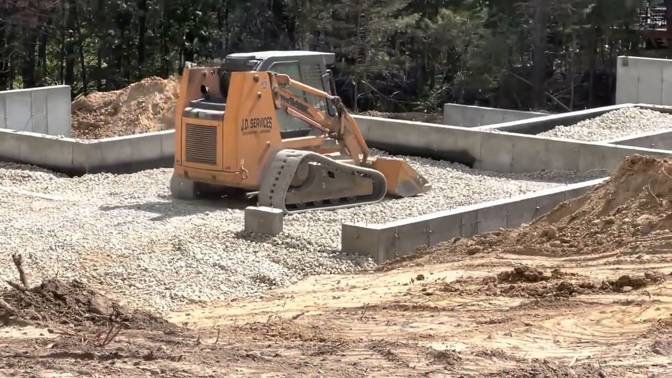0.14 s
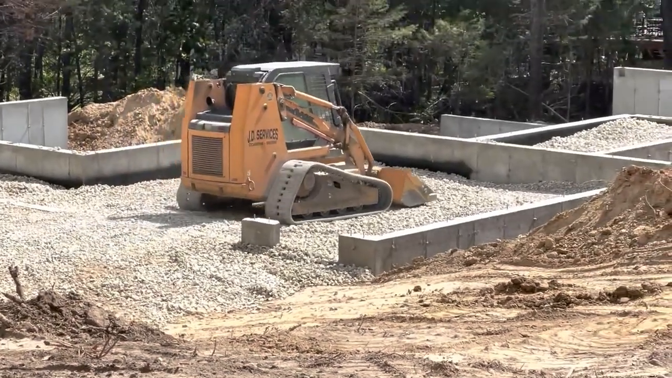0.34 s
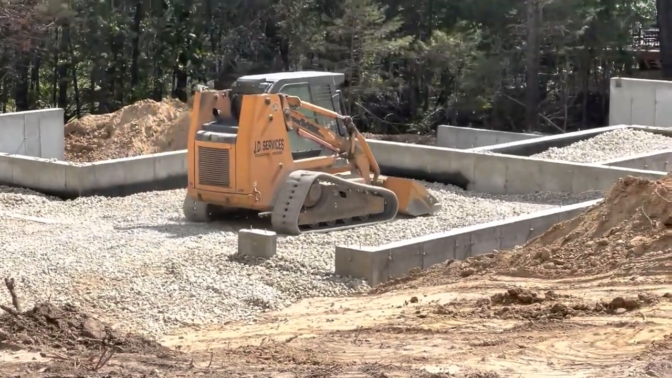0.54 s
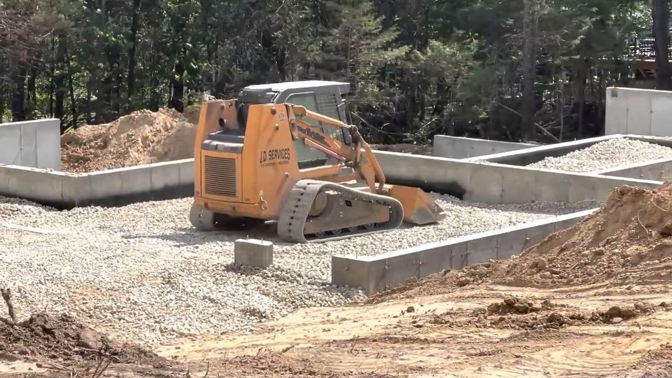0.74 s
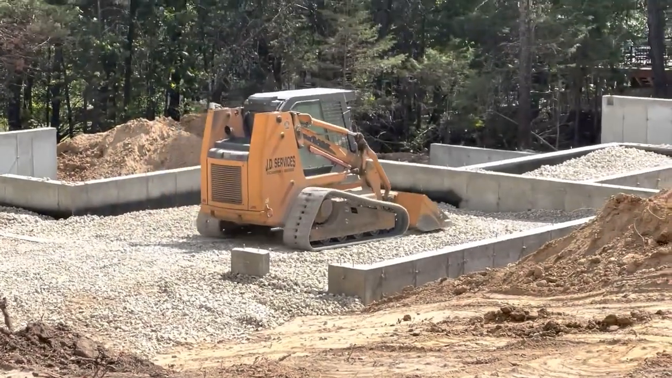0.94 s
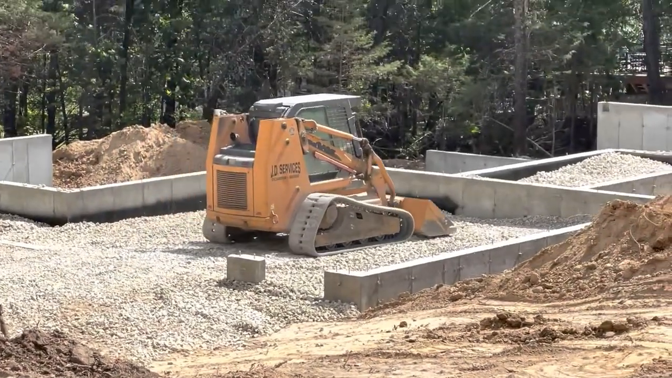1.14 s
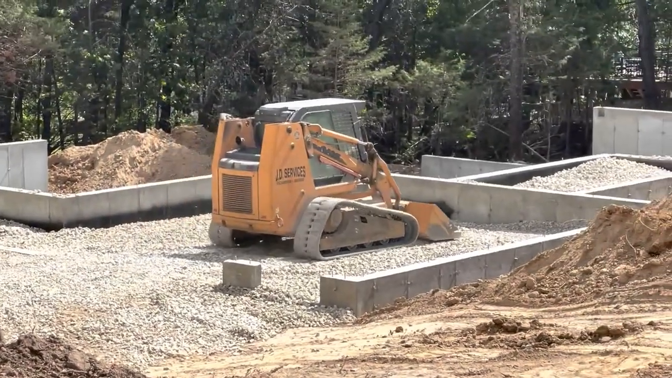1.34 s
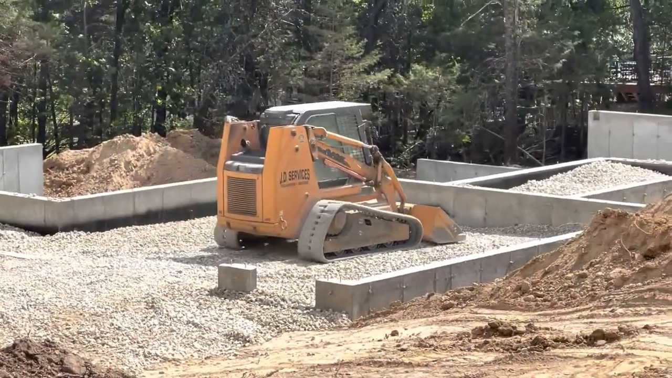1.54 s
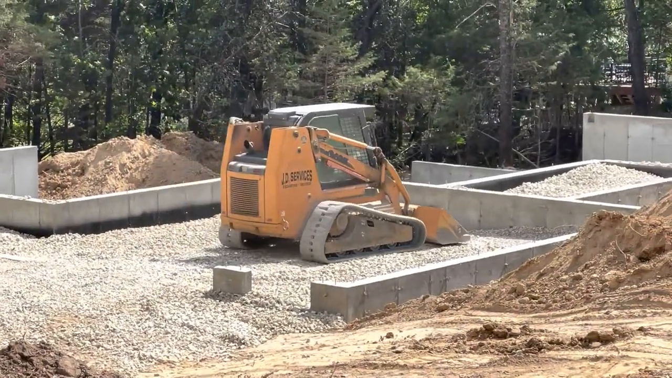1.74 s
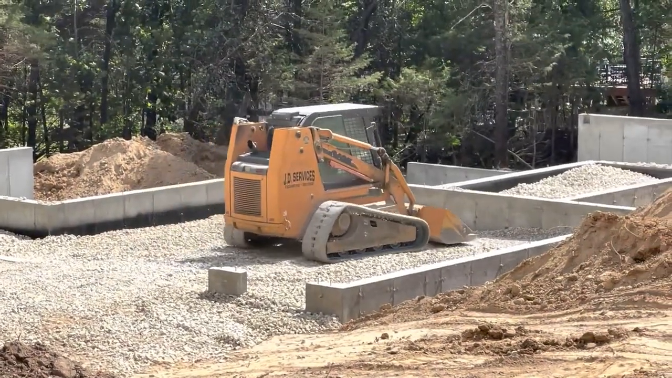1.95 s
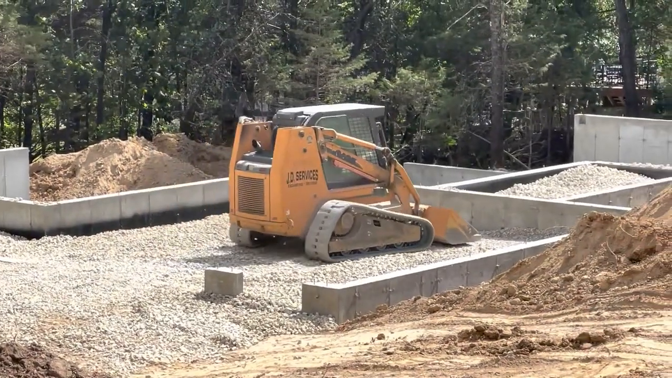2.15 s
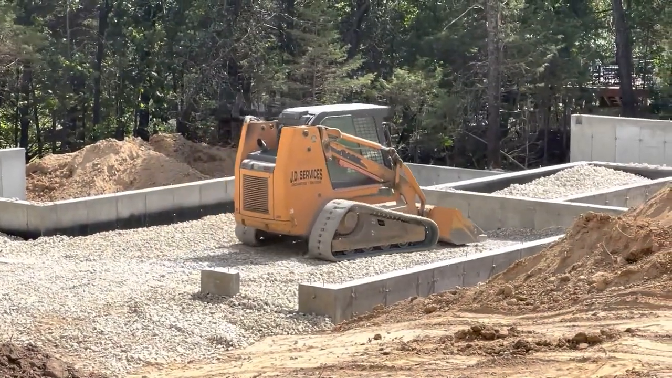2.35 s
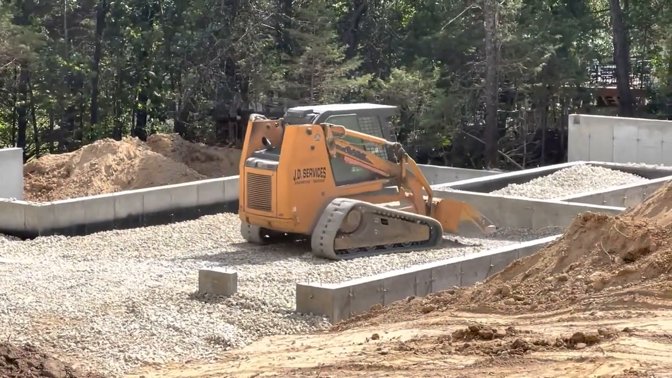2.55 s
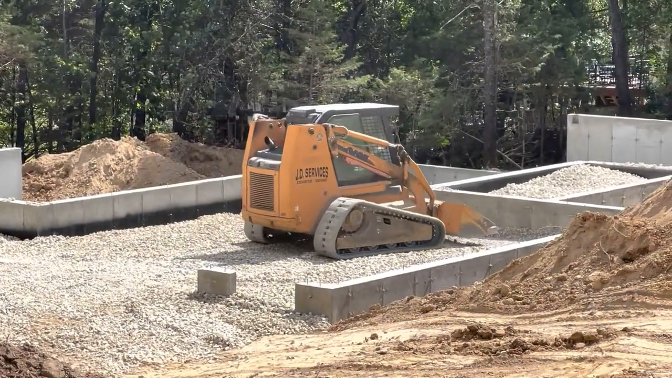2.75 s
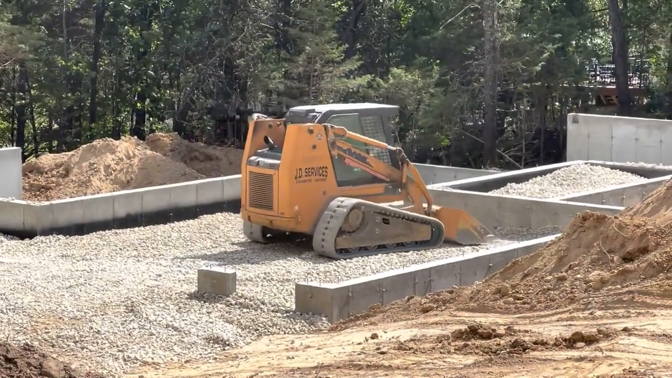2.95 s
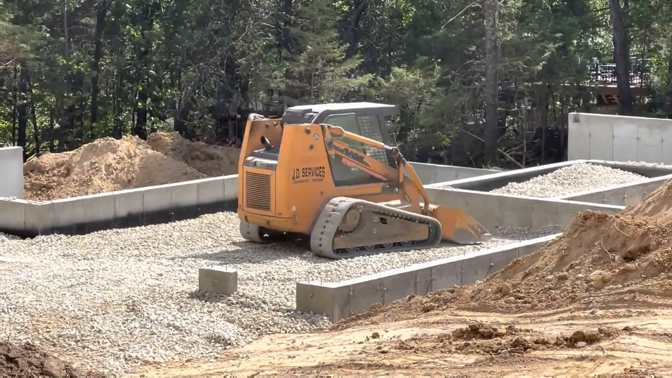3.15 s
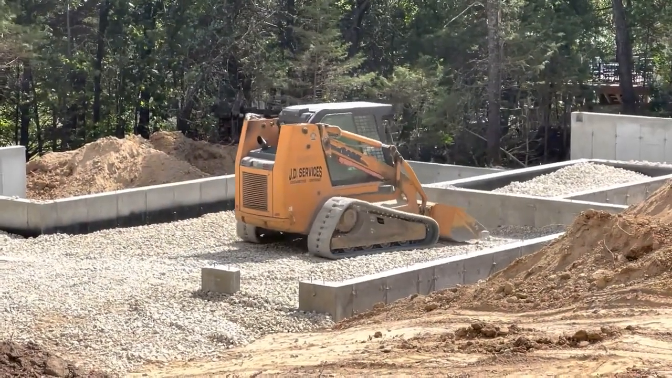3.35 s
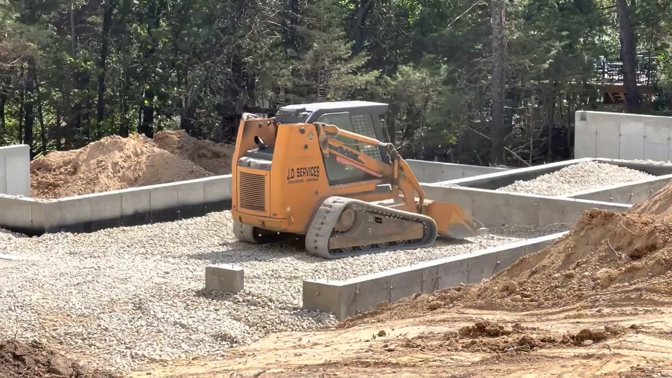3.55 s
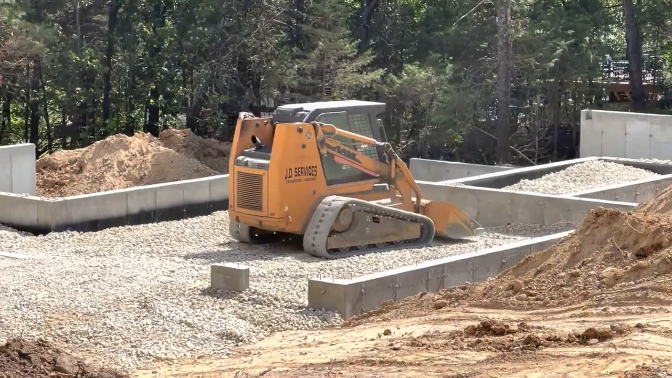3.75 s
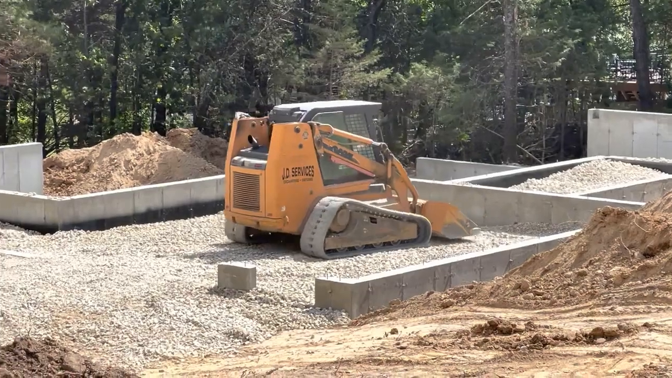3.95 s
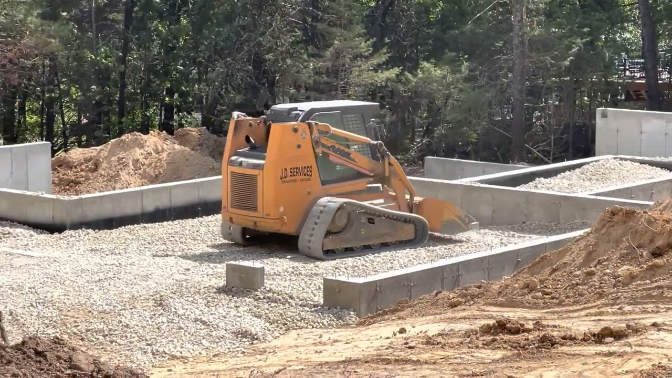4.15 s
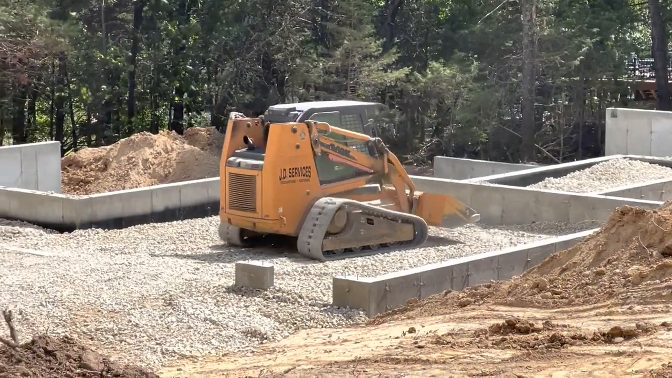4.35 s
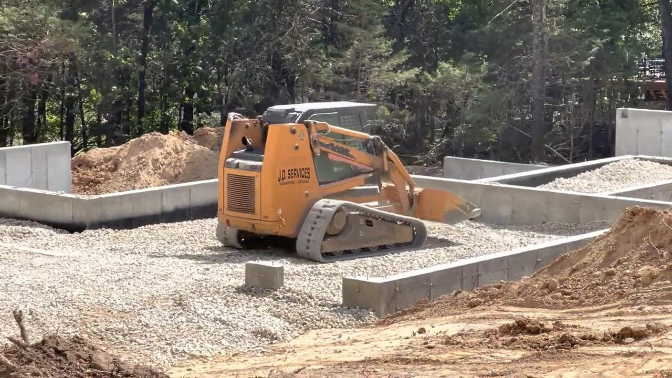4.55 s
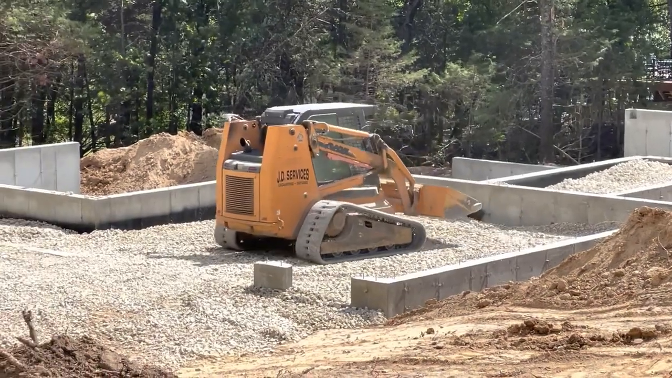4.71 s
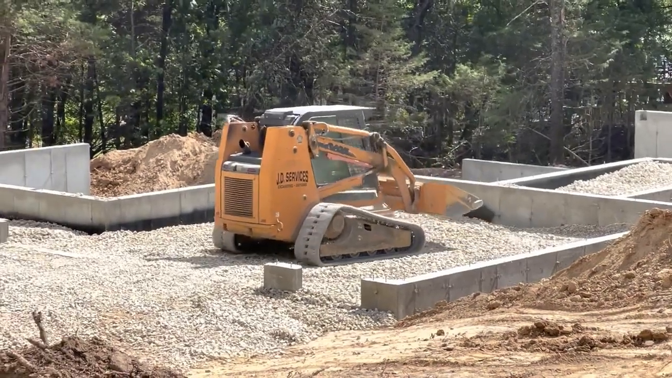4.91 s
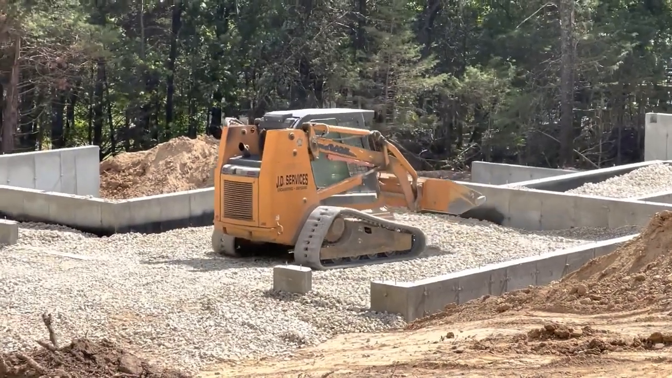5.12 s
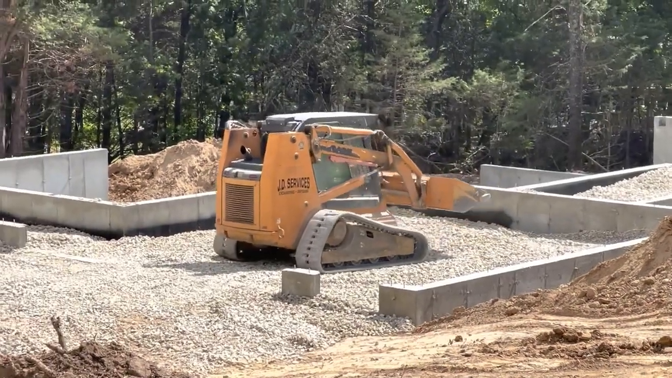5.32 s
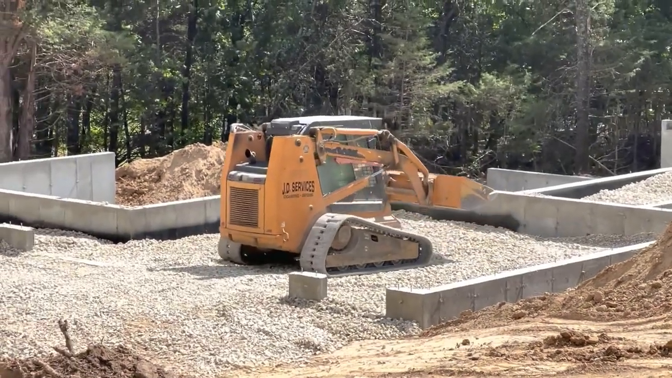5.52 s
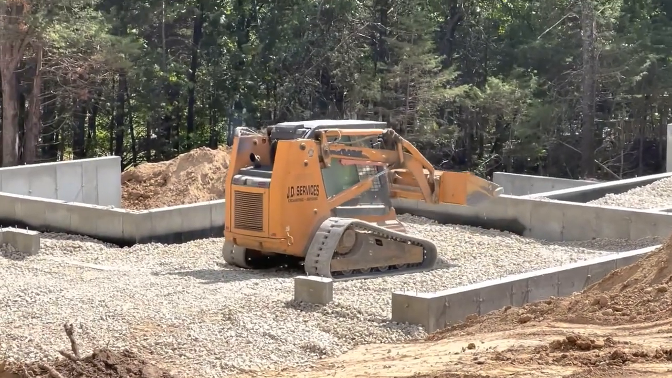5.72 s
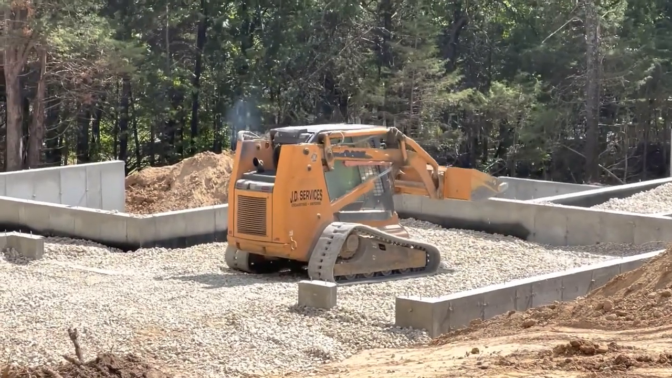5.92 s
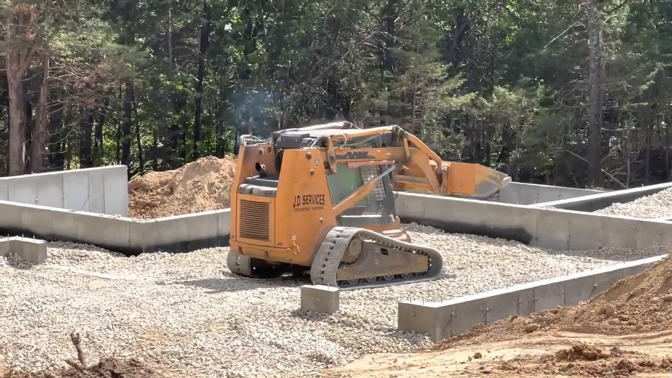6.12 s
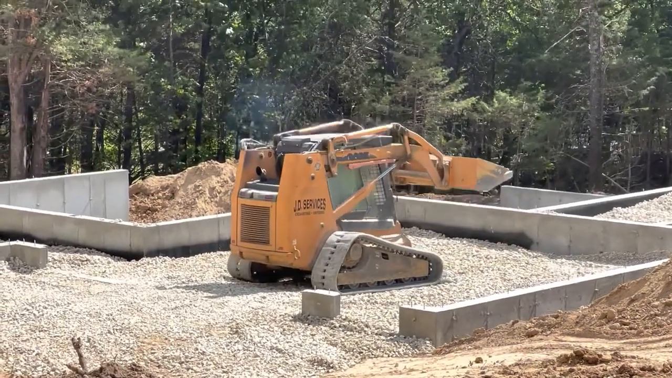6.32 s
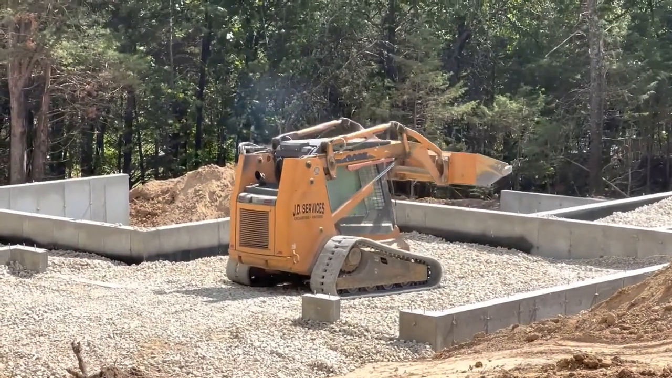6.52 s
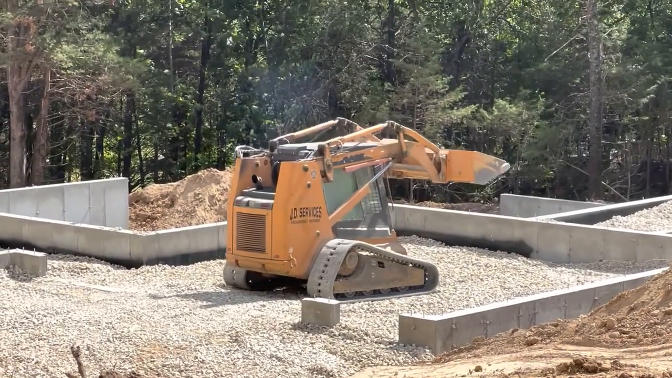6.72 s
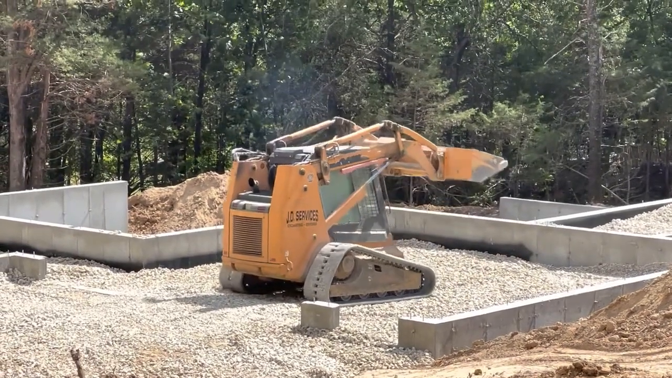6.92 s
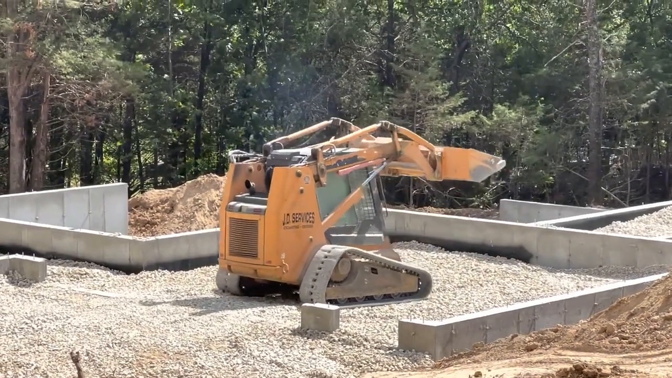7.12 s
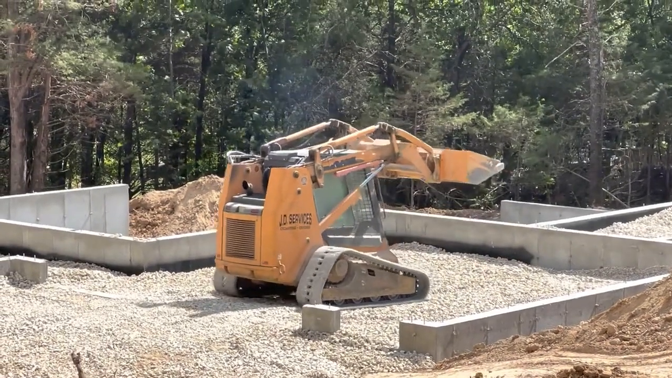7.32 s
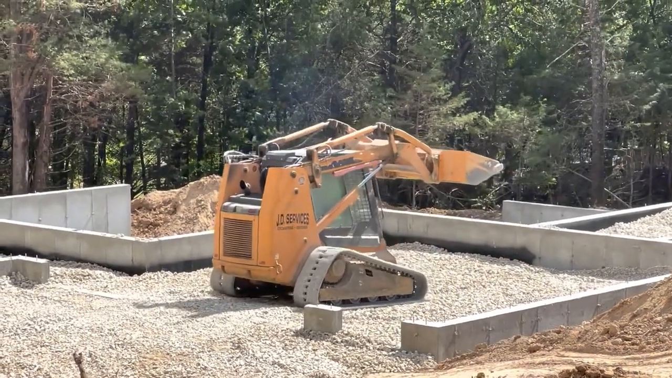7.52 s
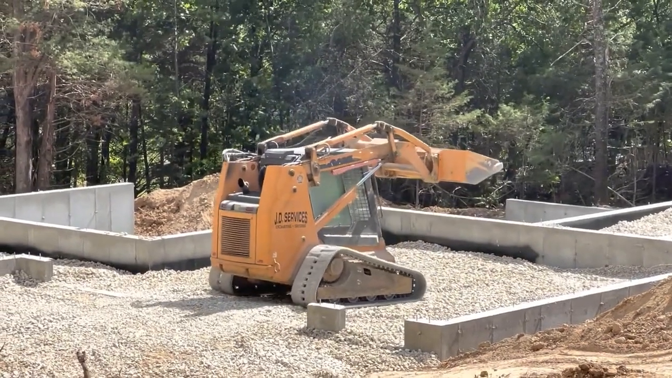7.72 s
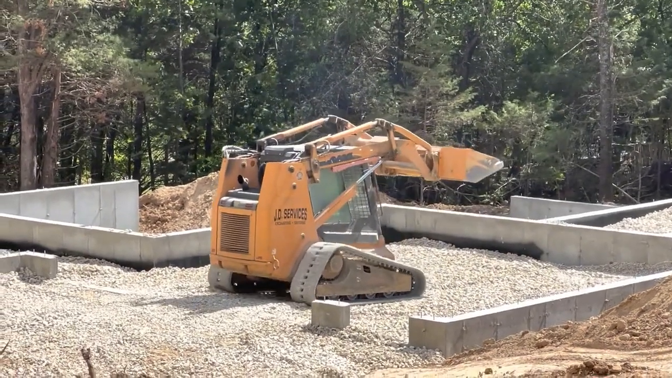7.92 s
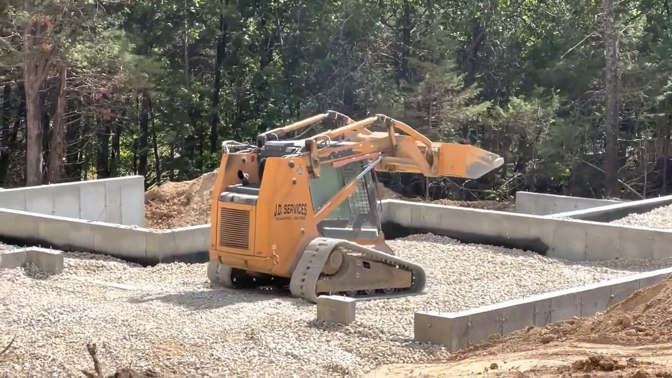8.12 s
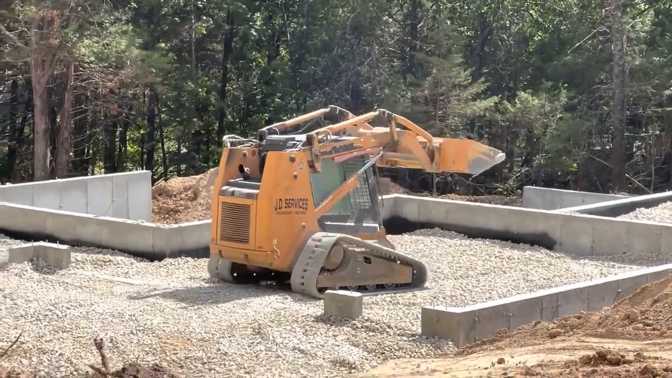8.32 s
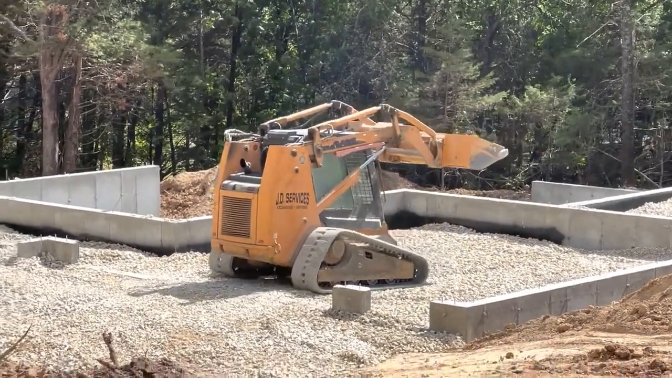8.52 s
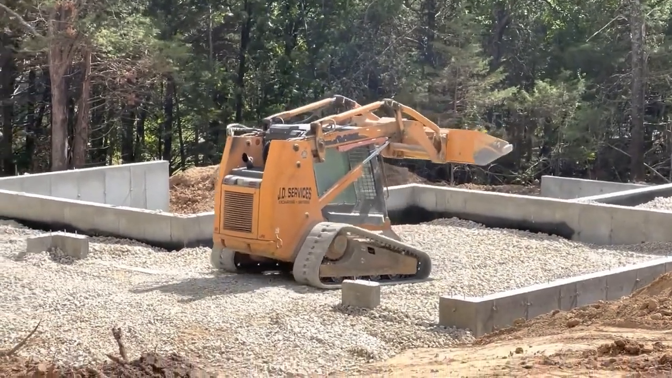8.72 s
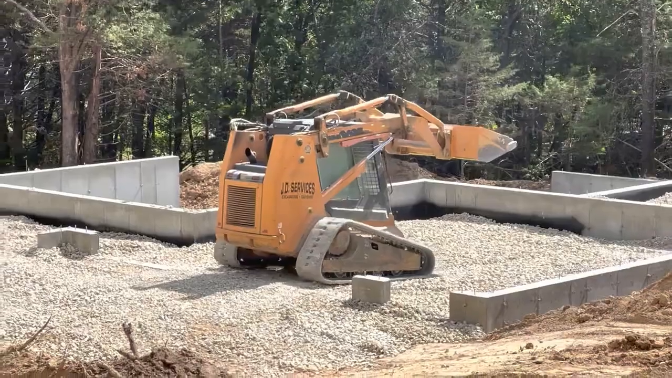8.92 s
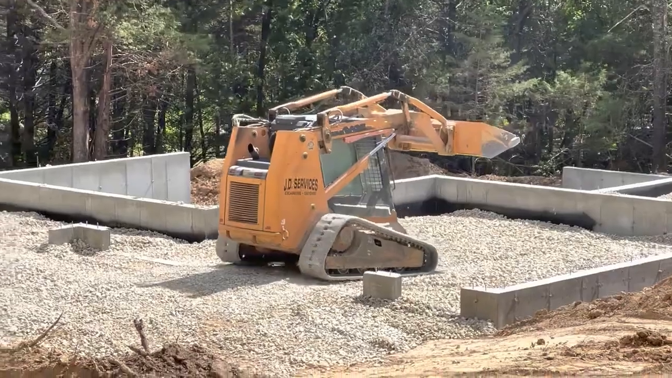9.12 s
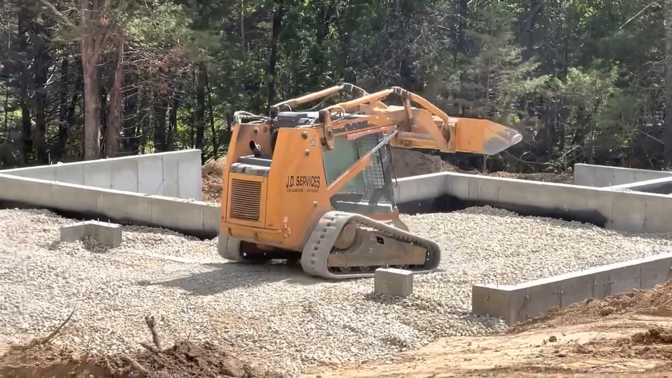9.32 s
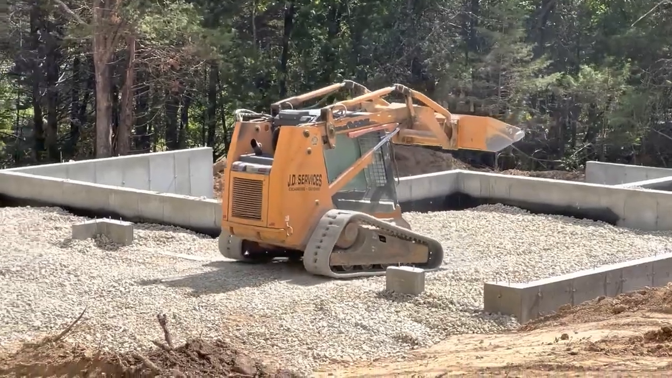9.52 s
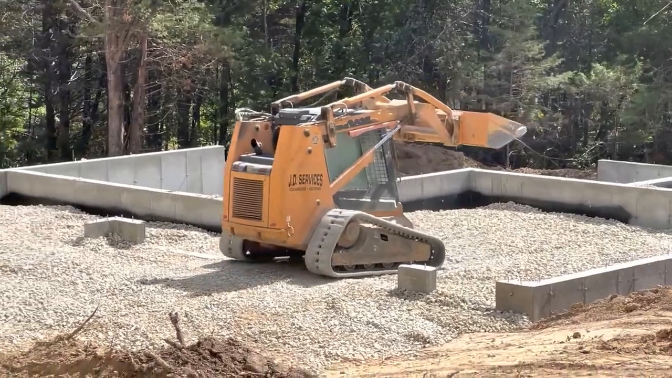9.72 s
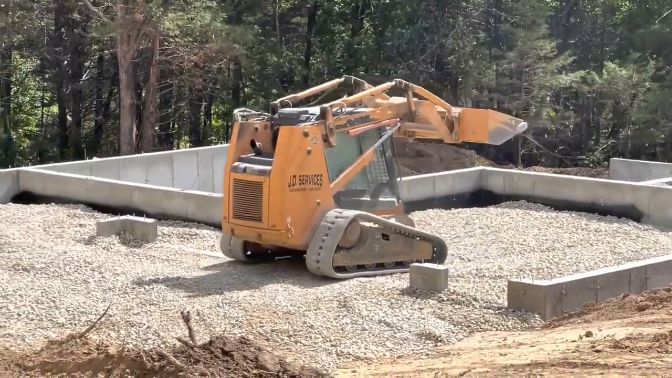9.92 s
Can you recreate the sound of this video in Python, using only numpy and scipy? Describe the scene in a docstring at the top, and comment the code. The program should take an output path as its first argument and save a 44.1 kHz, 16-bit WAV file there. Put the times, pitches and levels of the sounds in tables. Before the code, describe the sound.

A compact tracked loader works on gravel outdoors. Its diesel drones low and steady under a rough mechanical roar with faint turbine whistle. Joints squeak, then the bucket bites stone with hard crunches, thuds and ringing clanks. Loose links jingle. The engine sags, revs up once with a rising whistle, and settles to a slightly lower idle, with a few late squeaks and knocks. Handheld microphone at moderate distance, light wind rumble.

```python
"""A diesel throbs under a broadband roar: a tracked loader at work on gravel, revving once to lift its bucket.
The bucket crunches into stone, joints squeak, links knock and jingle, a breeze ruffles the microphone.
Engine tones follow one firing count; roar, air, stone and wind are filtered noise.
Steel is noise or short pushes through resonances; squeaks are gliding, fluttering tones."""
import sys
import numpy as np
from scipy import signal
from scipy.fft import rfft, irfft, next_fast_len
from scipy.io import wavfile
from scipy.ndimage import uniform_filter1d

SR = 44100
rng = np.random.default_rng(int(sys.argv[2]) if len(sys.argv) > 2 else 0)


def to_wav(sig):
    """Store sig (one row per channel, or 1-D mono) as 16-bit WAV at the path in sys.argv[1].

    Samples outside -1..1 are clipped; the rate is SR.
    """
    pcm = np.clip(np.atleast_2d(sig), -1, 1) * 32767
    pcm = np.round(pcm).astype(np.int16)
    wavfile.write(sys.argv[1], SR, pcm.T)  # frames by channels


def rack_gain(trim_db):
    """Turn a fader trim in dB into the linear factor to multiply a signal by."""
    fader = np.asarray(trim_db, float)
    return 10 ** (fader / 20)


N = 439236
T = np.arange(N) / SR
STEP = 64  # samples between values of slow controls

# wind on the microphone ports: time_s, level_db
WIND_LEVEL = [(0, -43.5), (.8, -46), (1.8, -52), (2.5, -46), (4.4, -55), (5.2, -59), (9.3, -66),
              (9.96, -41)]
# wind spectrum: freq_hz, gain_db
WIND_SPECTRUM = [(25, -20), (50, 6), (110, 14), (170, -4), (250, -9), (500, -46)]
# roar scattered from the sides: freq_hz, gain_db
SCATTER_SPECTRUM = [(29, -40), (50, -37), (319, 1.5), (902, 9), (1460, 3), (1820, -25), (2450, -28),
                    (2690, -20.5), (3970, -22.5), (4700, -3), (5460, -10), (9240, -24.5), (12000, -24),
                    (15500, -39)]

# loose links, the loudest shakes: time_s, level_db
JINGLES = [(1.23, -43), (1.3857, -53), (1.54, -48), (1.625, -46), (1.6616, -51), (1.781, -46), (1.875, -47),
           (1.91, -40), (1.962, -45), (2.027, -46), (2.2184, -56), (2.3205, -52), (2.6628, -51),
           (2.9861, -56), (3.9006, -45), (3.9914, -42), (4.0921, -44), (4.19, -40.5), (4.286, -41),
           (4.373, -49), (4.4703, -49), (4.5481, -39), (4.6368, -52), (4.8085, -50), (5.0915, -51),
           (5.2012, -52), (5.68, -48), (6.401, -42), (6.8775, -55), (8.7832, -55), (9.7613, -58)]
# modes of the links: freq_hz, level_db, ring_s
LINKS = [(8225, -4, .04), (8656, -9, .03), (9300, -10, .03), (11630, 0, .04), (11300, -8, .03),
         (12500, -8, .04), (13400, -11, .03), (15370, -14, .03)]
FAINT_JINGLES, FAINT_JINGLE_DB, FAINT_JINGLE_RANGE_DB = 16, -59, 9
LINK_SPREAD_DB, LINK_DETUNE_RATIO = 4, .003

# joints squeaking: start_s, level_db, start_hz, end_hz, length_s
SQUEAKS = [(0.674, -40, 5210, 5200, 0.021), (0.708, -49, 5200, 5070, 0.028),
           (1.175, -36, 6500, 6580, 0.083), (1.265, -40, 6530, 6430, 0.064),
           (1.274, -41.5, 7230, 7100, 0.036), (1.28, -39.5, 3610, 3680, 0.03),
           (1.977, -42, 5180, 5200, 0.019), (2.079, -36, 5020, 4870, 0.023), (2.094, -41, 4840, 4415, 0.02),
           (2.118, -40.5, 4700, 4240, 0.029), (2.143, -47, 5055, 5400, 0.034),
           (2.07, -43, 5250, 5300, .014), (2.104, -47, 5150, 5200, 0.037), (2.135, -45, 4500, 4900, .016),
           (2.172, -48, 5300, 5250, .03), (2.519, -36, 7160, 7020, 0.047), (2.514, -23, 8240, 8600, 0.031),
           (2.565, -48, 6590, 6486, 0.018), (2.65, -51, 6500, 6400, .025), (6.661, -39, 2890, 2890, 0.039),
           (6.768, -40, 3190, 3120, 0.04), (6.775, -41, 2910, 2980, 0.019), (6.776, -51, 5900, 5920, .03),
           (6.688, -53, 5900, 5930, .016), (6.833, -39.5, 3300, 3320, 0.016),
           (6.904, -36, 2193, 2130, 0.021), (6.907, -47, 4060, 4020, .02), (6.834, -46, 4150, 4150, 0.013),
           (8.035, -47, 3464, 3446, 0.036), (8.066, -39.5, 3426, 3740, 0.064),
           (8.149, -45, 3600, 3450, 0.036), (9.301, -41, 3330, 3276, 0.015),
           (9.345, -40, 3300, 3300, 0.028), (9.396, -37, 3194, 3060, 0.038),
           (9.419, -34, 3230, 3290, 0.025), (9.441, -35, 3280, 3270, 0.021), (9.395, -41, 3270, 3320, 0.02),
           (9.462, -44, 3330, 3257, 0.017), (9.555, -42, 4250, 4300, 0.016), (9.559, -45, 3850, 3930, .02),
           (9.576, -50, 4950, 4970, 0.026), (9.655, -39.5, 4050, 4150, 0.018)]
# steel knocks: start_s, peak_db, main_ring_hz
KNOCKS = [(0.806, -29, 3560), (1.6195, -45.5, 1420), (2.856, -28, 1570), (2.9066, -45, 1520),
          (2.955, -17, 3230), (3.002, -16, 1860), (3.056, -20.5, 2620), (3.1483, -33, 3236),
          (3.6693, -24, 900), (3.669, -26, 1740), (3.6894, -39, 1460), (3.76, -28, 1880),
          (3.8768, -29, 1500), (4.586, -28, 1514), (4.6, -32, 3580), (6.9092, -31, 2086),
          (9.5607, -36, 1398), (9.579, -34, 2720), (9.6558, -28, 2030), (9.759, -30, 1450)]
# modes of knocked steel: ratio_to_main_ring, level_db, ring_s
STEEL = [(1, 0, .05), (1.27, -12, .04), (1.95, -17, .03)]
# hard blows on the bucket shell: start_s, peak_db
BOOMS = [(2.955, -26), (2.975, -22), (2.986, -18), (3.155, -32), (3.6895, -17), (3.704, -24)]
# low modes of the shell: freq_hz, level_db, t60_s
SHELL = [(125, -5, .1), (250, 0, .2), (290, -6, .15), (400, -9, .06)]

# bucket biting into stone: peak_s, grit_db (above 2 kHz), scrape_db (near 1 kHz), thud_db, fade_db_per_s
CRUNCH = [(2.789, -49, -41, -40, 500), (2.807, -43, -37, -33, 200), (2.826, -41, -41, -45, 500),
          (2.857, -42, -35, -32, 400), (2.893, -38, -36, -40, 400), (2.908, -37, -28, -36, 153),
          (2.934, -38, -37, -37, 300), (2.947, -19.5, -34, -28, 300), (2.954, -25, -25, -22, 298),
          (2.983, -23, -24.5, -16, 300), (3.003, -18, -45, -33, 556), (3.035, -43, -47, -27, 300),
          (3.05, -36, -40, -39, 400), (3.068, -34, -38, -33, 300), (3.108, -43, -36, -36, 398),
          (3.154, -48, -46, -28, 152), (3.673, -40, -31, -40, 400), (3.681, -44, -27.5, -43, 400),
          (3.692, -54, -30, -30, 226), (3.726, -51, -38, -38, 400), (4.77, -39, -33, -47, 500),
          (3.754, -36, -35, -49, 400), (3.765, -36, -38, -47, 500), (3.773, -51, -45, -45, 500),
          (3.885, -37.5, -42, -40, 900)]
# grit spectrum: freq_hz, gain_db
STONE_SPECTRUM = [(1200, -0.5), (2000, 9.5), (3870, 12), (7370, -9), (12000, -19), (15500, -46)]
# scrape spectrum: freq_hz, gain_db
BLADE_SPECTRUM = [(350, -34), (700, -2), (1700, -7.5), (2600, -25), (6000, -52)]
# thud spectrum: freq_hz, gain_db
BUCKET_SPECTRUM = [(60, 0.5), (120, 4.5), (200, -2), (255, 3.5), (320, -5.5), (450, -6), (700, -32),
                   (2000, -62)]
BITE_DB_PER_S = 1300  # swell of each bite
CHIP_LOW_HZ, CHIP_HIGH_HZ, CHIP_WIDTH_HZ, CHIP_SHARE = 1290, 5200, 450, 0.18

# cooling air through the grille, near 10 kHz: time_s, level_db
HISS_LEVEL = [(0, -63), (.5, -72), (1.3, -64), (2.4, -63), (3.2, -72), (4.1, -65), (5.5, -68), (5.88, -61),
              (6.05, -67), (6.8, -64), (7.2, -69), (8.1, -64.5), (9.25, -70), (9.96, -65)]
# air spectrum, also the rustle of links: freq_hz, gain_db
HISS_SPECTRUM = [(5000, -25), (6500, -3), (8400, -4), (9600, -7), (11500, -5), (13200, -10), (13900, -18),
                 (15600, -28)]
# rollers and chassis: freq_hz, gain_db
RUMBLE_SPECTRUM = [(30, -23), (45, 6), (80, 1), (120, 2), (220, 0), (330, -4.5), (450, -16), (700, -88)]
RUMBLE_BELOW_ROAR_DB, RUMBLE_FOLLOWS = 4.5, 0.5  # share of the roar's level changes

# turbine whistle: time_s, pitch_hz, level_db
WHINE = [(0, 2412, -52), (2.4, 2450, -55), (3.4, 2435, -54), (3.8, 2454, -51), (3.95, 2440, -47),
         (4.12, 2455, -50.5), (4.27, 2430, -46.5), (4.6, 2440, -52), (5.3, 2415, -61), (5.59, 2305, -54),
         (5.66, 2460, -45), (5.729, 2535, -45), (5.78, 2660, -47), (5.84, 2705, -43.5), (5.97, 2670, -48),
         (6.051, 2555, -60), (6.15, 2500, -55), (6.3, 2480, -61), (7, 2420, -55.5), (9, 2413, -54),
         (9.6, 2430, -46.5), (9.96, 2461, -48)]
# two higher whistles: centre_hz, width_hz, level_db
UPPER_WHINE = [(2880, 110, -6), (5500, 220, -9)]
# their common level while the engine picks up: time_s, level_db
UPPER_WHINE_LEVEL = [(5.6, -80), (5.7, -48), (5.83, -42), (5.95, -52), (6.12, -63), (6.3, -70)]
# pitch swing grows with the firing tone
SWING_HZ, SWING_MOST_HZ, SWING_AT_DB, SWING_GROWTH = 20, 110, -29, 2.6

# firing rate before flywheel smoothing: time_s, rate_hz
SPEED = [(0, 53.1), (.8, 53.2), (1.7, 53.7), (2, 53.3), (2.6, 53.8), (3, 55.6), (3.5, 54.5), (4.1, 53.7),
         (4.4, 52.7), (4.75, 52.3), (5, 48.9), (5.3, 47.3), (5.62, 44.8), (5.76, 51.5), (5.92, 61.2),
         (6.08, 66.9), (6.17, 68.2), (6.4, 68.4), (6.48, 66.5), (6.72, 54.6), (6.9, 51.5), (7.3, 51.8),
         (8.2, 51), (8.8, 50.9), (9.4, 50.2), (9.96, 50)]
# engine levels: time_s, firing_db, octave_db, roar_db (near 1 kHz), clatter_db (near 4 kHz)
ENGINE = [(0, -32, -37, -34.5, -42), (1.3, -32, -40, -35.5, -42), (1.77, -29.5, -43.5, -37.5, -43.5),
          (2.621, -29, -40, -37.5, -46), (2.903, -31, -52, -39, -47), (3.7, -29.5, -38, -36, -47.5),
          (3.9, -30, -44, -35, -47), (4.442, -26.5, -33.5, -35, -44.5), (4.76, -26.5, -41.5, -36, -46),
          (4.99, -29.5, -47, -37, -46), (5.27, -31.5, -42, -38.5, -47), (5.41, -32.5, -42.5, -42, -49.5),
          (5.619, -40, -57, -38, -46.5), (5.67, -30, -29, -35.5, -40), (5.74, -23.5, -18, -33.5, -41),
          (5.86, -24, -18.5, -32.5, -41.5), (5.961, -20, -43, -32.5, -44.5),
          (6.052, -20.5, -33, -33, -44.5), (6.131, -24.5, -44, -34, -43.5), (6.35, -25, -45, -34.5, -43.5),
          (6.49, -23, -43, -36.5, -47), (6.6, -24.5, -46, -36, -45.5), (6.68, -27, -33, -37.5, -46),
          (6.77, -27.5, -33, -39, -44.5), (6.881, -31, -53, -36, -47.5), (7.1, -29.5, -45, -36, -47.5),
          (7.7, -28.5, -45.5, -34.5, -46.5), (9, -28.5, -38.5, -36.5, -46), (9.43, -27.5, -38.5, -36, -48),
          (9.96, -28, -44, -36.5, -47.5)]
FIRING, OCTAVE, ROAR, CLATTER = 1, 2, 3, 4  # columns of ENGINE
# exhaust, fan and pump tones: multiple_of_firing_rate
ORDERS = [1.5, 2.5, 3, 3.5, 4, 4.5, 5, 6, 7, 7.5, 8, 9, 14, 15, 16, 17, 18, 20, 21, 23, 24]
# their levels as the loader turns, before pipe and load: start_db, end_db
ORDER_LEVELS = [(-47, -54), (-56, -49), (-53.5, -47.5), (-50, -42.5), (-54, -48.5), (-56, -68),
                (-54.5, -56), (-62, -63), (-55, -53.5), (-56, -51.5), (-60.5, -61), (-76, -53),
                (-51.5, -56), (-49, -52), (-58, -45), (-50.5, -62), (-62, -54.5), (-51.5, -55),
                (-69, -52.5), (-55, -61), (-55.5, -45.5)]
# exhaust pipe resonances: centre_hz, width_hz, lift_db
PIPE = [(156.5, 18.3, 7.5), (252, 50, 12), (468, 95, 7.5)]
# load on the orders below 10: time_s, gain_db
LOAD = [(0, 0.5), (.8, 3), (1.5, -0.5), (2.3, -2), (3.2, 0), (4, -1.5), (4.8, -3), (5.5, -7.5), (5.75, -2),
        (5.95, -2), (6.15, 2), (6.4, 3.5), (6.55, 2), (6.8, -4.5), (7.2, -2), (8, -2.5), (9, -3.5),
        (9.96, -3)]
# block, fan and rolling tracks: freq_hz, gain_db
ROAR_SPECTRUM = [(250, -68), (400, -20.5), (560, -21), (800, -14.5), (1000, -19), (1250, -13), (1700, -23),
                 (2200, -28.5), (2800, -90), (3600, -122.5)]
# valve clatter: freq_hz, gain_db
CLATTER_SPECTRUM = [(1200, 5.5), (2200, 4.5), (3600, 4.5), (4900, 1), (5800, -6.5), (6600, -15),
                    (7500, -10), (9000, -45)]
# body panels, some coming forward as the loader turns: centre_hz, width_hz, start_db, end_db
PANELS = [(746, 10, -16.5, -12), (800, 34, -14, -11), (920, 6.6, -4, -10), (1079, 4.9, -21, -15.5),
          (1226.5, 11, -4.5, -3.5), (1457, 4.8, -7, -12.5), (381, 8.5, -17, -22.5), (1803, 104, -5, -18.5)]
OCTAVE_FLICKER_DB, LOAD_WAVER_DB = 3, 1  # uneven firing
THIRD_BELOW_OCTAVE_DB = 11
# noise pulses with each firing, deeper under load
THROB_DB, THROB_AT_DB, THROB_GROWTH, THROB_LAG_TURNS = .8, -27, .22, .22

# phase between the microphone ports: freq_hz, left_lead_rad
PORT_PHASE = [(0, 0), (4130, -0.0), (5340, -0.8), (6030, -0.1), (6720, -0.1), (7320, -0.5), (7670, 3.3),
              (9390, 3.3), (9910, 6.1), (11500, 6.4), (12600, 9.4), (14100, 9.5), (14600, 12.4),
              (16500, 12.8)]
# balance of the ports: freq_hz, left_minus_right_db
PORT_BALANCE = [(60, 0), (200, -.5), (700, -1), (1300, 0), (16000, 0)]
LOW_CUT_HZ, EDGE_HZ = 40, 15650


def evened(x):
    """Scales to rms 1."""
    return x / np.sqrt(np.mean(x ** 2) + 1e-20)


def noise():
    """White noise for the whole scene."""
    return rng.standard_normal(N)


def read(points, hz):
    """Reads a spectrum on a log-frequency axis."""
    f, value = np.transpose(points)
    return np.interp(np.log(hz + 1), np.log(f + 1), value)


def column(table, k=1, t=T):
    """Column k of a timed table, interpolated at times t."""
    rows = np.transpose(table)
    return np.interp(t, rows[0], rows[k])


def add(mix, s, sound):
    """Mixes a sound in at time s."""
    part = mix[round(s * SR):][:len(sound)]
    part += sound[:len(part)]


def coloured(x, points, band=(0, SR)):
    """Filters x by a spectrum, scaled to rms 1 within the band."""
    size = next_fast_len(len(x))
    hz = np.fft.rfftfreq(size, 1 / SR)
    z = rfft(x, size) * rack_gain(read(points, hz))
    power = abs(z) ** 2
    share = power[(hz >= band[0]) & (hz < band[1])].sum() / power.sum()
    return evened(irfft(z, size)[:len(x)]) / np.sqrt(share)


def resonate(x, hz, width_hz):
    """Resonance of gain 1 along the curve hz: shift down to zero, smooth, shift back."""
    turn = np.exp(2j * np.pi * np.cumsum(hz * np.ones(len(x))) / SR)
    r = np.exp(-np.pi * abs(width_hz) / SR)
    return 2 * (turn * signal.lfilter([1 - r], [1, -r], x * turn.conj())).real


def resonate_twice(x, hz, width_hz):
    """Two equal resonances in series, for steeper skirts."""
    return resonate(resonate(x, hz, width_hz), hz, width_hz)


def wander(per_s, t=T):
    """Slow chance: straight lines between per_s normal values of rms 1 a second."""
    knots_s = np.arange(0, T[-1] + 1, 1 / per_s)
    return np.interp(t, knots_s, rng.standard_normal(len(knots_s)))


def grit(count, spread_db, density):
    """Sparse clicks of very uneven size."""
    size = rack_gain(spread_db * np.minimum(rng.exponential(1, count), 5))
    return size * rng.standard_normal(count) * (rng.random(count) < density)


def firing():
    """Firing rate in Hz, steadied by the flywheel, and the count of firings so far."""
    hz = uniform_filter1d(column(SPEED), size=2000, mode="nearest")
    return hz, np.cumsum(hz * (1 + 0.00118 * wander(8))) / SR


def throb(turns):
    """Level swing in dB that peaks with each exhaust pulse."""
    depth_db = THROB_DB + THROB_GROWTH * np.maximum(column(ENGINE, FIRING) - THROB_AT_DB, 0)
    return depth_db * np.cos(2 * np.pi * (turns - THROB_LAG_TURNS))


def wind():
    """Lumpy gusts of low noise, unrelated at the two ports."""
    gusts_db = column(WIND_LEVEL) + 7.9 * wander(2.99)
    return rack_gain(gusts_db) * np.array([coloured(noise(), WIND_SPECTRUM) for port in "LR"])


def side_scatter():
    """A little roar from the sides, as wavering noise."""
    return rack_gain(-52.5 + 1.6 * wander(11)) * coloured(noise(), SCATTER_SPECTRUM)


def walls(x):
    """Sparse fading echoes from low walls and the tree line."""
    taps = np.zeros(SR // 2)
    at = np.arange(500, len(taps) - 20, 20)
    sign = rng.choice([-1., 1.], len(at))
    taps[at + rng.integers(0, 20, len(at))] = sign * rack_gain(-60 * at / SR / 0.27)  # 60 dB in 0.27 s
    return signal.oaconvolve(x, taps / np.linalg.norm(taps))[:N]


def jingles():
    """Each shake sends brief clicks through small links, slightly different ones every time."""
    out, t = np.zeros(N), T[:3500]
    faint = rng.random((FAINT_JINGLES, 2)) * [T[-1], FAINT_JINGLE_RANGE_DB] + [0, FAINT_JINGLE_DB]
    for s, db in JINGLES + faint.tolist():
        shake = grit(len(t), 1.3, 0.018) * np.exp(-t / 0.013) * np.minimum(t / 0.014, 1) ** 2
        ring = np.zeros(len(t))
        for hz, link_db, ring_s in LINKS:
            spread_db, detune = np.clip(rng.standard_normal(2), -2, 2) * [LINK_SPREAD_DB, LINK_DETUNE_RATIO]
            link_hz = hz * (1 + detune)
            mode = resonate(resonate(shake, link_hz, 700), link_hz, 3.0 / ring_s)
            ring += rack_gain(link_db + spread_db) * mode / abs(mode).max()
        rustle = coloured(shake, HISS_SPECTRUM)
        add(out, s, rack_gain(db) * (ring + .35 * rustle / abs(rustle).max()))
    return out


def squeaks():
    """Stick-slip whistles: gliding tones that flutter in size."""
    out = np.zeros(N)
    for s, db, start_hz, end_hz, length_s in SQUEAKS:
        rub = rng.standard_normal(round(length_s * SR))
        hz = np.linspace(start_hz, end_hz, len(rub))
        turn = 2 * np.pi * np.cumsum(hz) / SR
        tone = np.sin(turn) + 0.12 * np.sin(2 * turn)
        tone += 0.5 * evened(resonate_twice(rub, hz, 450))
        tone *= rack_gain(4 * wander(140)[:len(rub)])
        add(out, s, rack_gain(db) * evened(tone) * signal.windows.tukey(len(rub), .6))
    return out


def knocks():
    """A short scrape of noise sets steel ringing."""
    out, t = np.zeros(N), T[:6000]
    for s, db, hz in KNOCKS:
        blow = rng.standard_normal(len(t)) * np.exp(-t / .004) * np.minimum(t / .003, 1)
        ring = .17 * coloured(blow, STONE_SPECTRUM)
        for ratio, mode_db, ring_s in STEEL:
            ring += rack_gain(mode_db) * evened(resonate(blow, hz * ratio, 2.4 / ring_s))
        add(out, s, rack_gain(db) * ring / abs(ring).max())
    return out


def booms():
    """One short push sets the low modes of the bucket ringing."""
    out, t = np.zeros(N), T[:9000]
    for s, db in BOOMS:
        ring = np.zeros(len(t))
        for hz, mode_db, t60_s in SHELL:
            mode_hz = hz * (1 + .025 * rng.standard_normal())
            ring += rack_gain(mode_db - 60 * t / t60_s) * np.sin(2 * np.pi * mode_hz * t)
        add(out, s, rack_gain(db) * ring / abs(ring).max())
    return out


def crunch():
    """Dense uneven grains of stone break under the blade, chips ring briefly and the bucket thuds."""
    power, t = np.zeros((3, N)), T[:30000] - .2  # t = 0 at the peak
    for s, *peaks_db, fade_db_per_s in CRUNCH:
        shape_db = np.where(t < 0, BITE_DB_PER_S * t, -fade_db_per_s * t)
        for layer, db in zip(power, peaks_db):
            add(layer, s + t[0], rack_gain(2 * (db + shape_db)))  # bites add in power
    grains = grit(N, 1.0, 0.34) * rack_gain(4 * wander(160))
    chips_hz = np.geomspace(CHIP_LOW_HZ, CHIP_HIGH_HZ, num=12)
    chips = sum(resonate(grit(N, 1.5, .006), hz, CHIP_WIDTH_HZ) for hz in chips_hz)
    stone = evened(coloured(grains, STONE_SPECTRUM) + CHIP_SHARE * evened(chips))
    scrape = coloured(grains, BLADE_SPECTRUM)
    thud = coloured(noise(), BUCKET_SPECTRUM)
    return (np.sqrt(power) * [stone, scrape, thud]).sum(0)


def hiss():
    """Flickering air noise at the top of the range, with sparse clicks."""
    air = noise() + 0.24 * evened(grit(N, 2.6, 0.013))
    air = coloured(air, HISS_SPECTRUM, (9900, 11200))
    return rack_gain(column(HISS_LEVEL) + 1.0 * wander(14)) * air


def rumble(turns):
    """Low noise of chassis and rollers, throbbing with each firing."""
    low = coloured(noise(), RUMBLE_SPECTRUM, (125, 400))
    roar_db = column(ENGINE, ROAR)
    mean_db = roar_db.mean()
    db = mean_db - RUMBLE_BELOW_ROAR_DB + RUMBLE_FOLLOWS * (roar_db - mean_db)
    return rack_gain(db + 1.2 * wander(14) + 2.2 * np.cos(2 * np.pi * turns - 1)) * low


def upper_whine(turns):
    """Two bands of whistling noise that pulse with the exhaust."""
    bands = sum(rack_gain(db) * evened(resonate_twice(noise(), hz, width_hz)) for hz, width_hz, db in UPPER_WHINE)
    return bands * rack_gain(column(UPPER_WHINE_LEVEL) + 2 * throb(turns))


def whine(turns):
    """A fluttering turbine whistle whose pitch and size swing with the exhaust pulses."""
    pulses = uniform_filter1d(rack_gain(SWING_GROWTH * (column(ENGINE, FIRING) - SWING_AT_DB)), size=6000)
    swing_hz = np.minimum(SWING_HZ * (1 + pulses), SWING_MOST_HZ)
    hz = column(WHINE, 1) + swing_hz * (np.sin(2 * np.pi * turns) + 0.36 * wander(50))
    db = column(WHINE, 2) + 2.5 * wander(50) + 1.2 * wander(12)
    db += 2 * np.cos(np.pi * turns) + 2.6 * throb(turns)  # the first repeats every other firing
    turn = 2 * np.pi * np.cumsum(hz) / SR
    breath = evened(resonate_twice(noise(), hz, 140))
    return rack_gain(db) * (1.1 * np.sin(turn) + 0.25 * np.sin(2 * turn) + 0.6 * breath)


def clatter(turns):
    """Valve clatter: noise and sparse ticks that pulse with the firing."""
    ticks = evened(grit(N, 2.4, .01) * rack_gain(2 * throb(turns)))
    rattle = coloured(noise() + 0.4 * ticks, CLATTER_SPECTRUM, (2000, 6000))
    return rack_gain(column(ENGINE, CLATTER) + throb(turns) + 1.0 * wander(13)) * rattle


def body_panels():
    """Panels rung by combustion knock, as narrow resonances of one uneven noise."""
    knock = noise() * rack_gain(0.79 * wander(40))
    out = np.zeros(N)
    for hz, width_hz, start_db, end_db in PANELS:
        db = start_db + (end_db - start_db) * T / T[-1]
        out += rack_gain(db + 0.5 * wander(6.6)) * evened(resonate(knock, hz, width_hz))
    return out


def roar(turns):
    """Wavering broadband noise and ringing panels that throb together."""
    body = coloured(noise(), ROAR_SPECTRUM) * rack_gain(0.5 * wander(28)) + 0.59 * body_panels()
    body = coloured(body, [(1, 0)], (500, 1700))  # flat: sets the level only
    return rack_gain(column(ENGINE, ROAR) + throb(turns) + 0.8 * wander(9)) * body


def orders(hz, turns):
    """Tones locked to engine speed, lifted by the pipe and by load, each wavering in size and phase."""
    t, hz, out = T[::STEP], hz[::STEP], np.zeros(N)
    load_db = column(LOAD, t=t) + LOAD_WAVER_DB * wander(5.6, t)
    for k, (start_db, end_db) in zip(ORDERS, ORDER_LEVELS):
        db = start_db + (end_db - start_db) * t / t[-1]
        db += sum(lift_db / (1 + (2 * (k * hz - f) / width_hz) ** 2) for f, width_hz, lift_db in PIPE)
        db += load_db * (k < 10)  # exhaust orders only
        db += 1.5 * wander(4, t) + 1.5 * wander(15, t)
        drift = 2 * np.pi * rng.random() + .3 * wander(4, t) + .25 * wander(20, t)
        tone = np.sin(2 * np.pi * k * turns + np.interp(T, t, drift))
        out += np.sqrt(2) * np.interp(T, t, rack_gain(db)) * tone
    return out


def firing_tones(turns):
    """Clean exhaust tones at one, two and three times the firing rate."""
    octave_db = column(ENGINE, OCTAVE)
    flicker_db = OCTAVE_FLICKER_DB * np.clip((-27.0 - octave_db) / 11, 0, 1) * wander(14)  # steady when loud
    out = rack_gain(column(ENGINE, FIRING) + 0.36 * wander(16)) * np.sin(2 * np.pi * turns)
    out += rack_gain(octave_db + flicker_db) * np.sin(4 * np.pi * turns - 1.2)
    out += rack_gain(octave_db - THIRD_BELOW_OCTAVE_DB) * np.sin(6 * np.pi * turns - 2.4)
    return np.sqrt(2) * out


def engine(hz, turns):
    """Diesel: firing tones and orders, roar with rung panels, and valve clatter."""
    return firing_tones(turns) + orders(hz, turns) + roar(turns) + clatter(turns)


def scene():
    """The machine straight ahead with its echoes, a little roar scattered from the sides, and wind."""
    hz, turns = firing()
    hits = crunch() + booms() + knocks() + jingles()
    creaks = squeaks()
    loader = engine(hz, turns) + whine(turns) + upper_whine(turns) + hiss() + rumble(turns)
    loader += hits + creaks + walls(rack_gain(-15.0) * hits + rack_gain(-10.0) * creaks)
    scattered = side_scatter()
    return np.array([loader + scattered, loader - scattered]) + wind()


def low_pass(x):
    """Removes everything above the highest recorded frequency."""
    return signal.sosfilt(signal.butter(12, 16850, fs=SR, output="sos"), x)


def record(dry):
    """Two close microphone ports shift the phase apart towards the treble; then low cut and band limit."""
    size = next_fast_len(N)
    hz = np.fft.rfftfreq(size, 1 / SR)
    half = np.exp(.5j * read(PORT_PHASE, hz)) * rack_gain(read(PORT_BALANCE, hz) / 2)
    low_cut = 1 / np.sqrt(1 + (LOW_CUT_HZ / (hz + 1)) ** 6)
    response = np.array([half, 1 / half]) * (hz < EDGE_HZ) * low_cut
    ports = irfft(rfft(dry, size) * response, size)[:, :N]
    return low_pass(ports)


dry = scene()
out = record(dry)
to_wav(out)
```